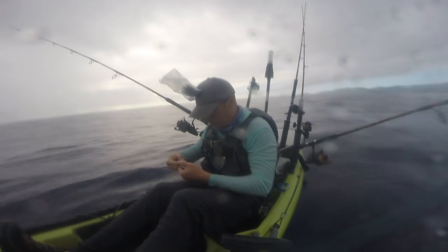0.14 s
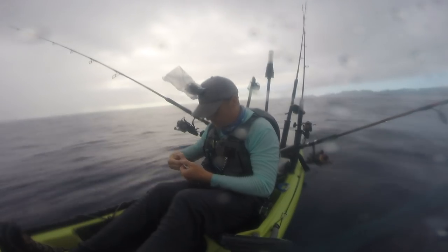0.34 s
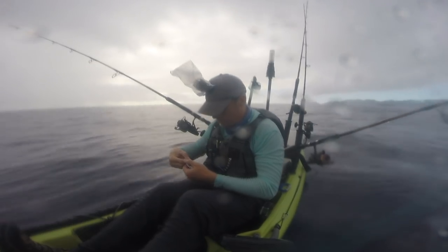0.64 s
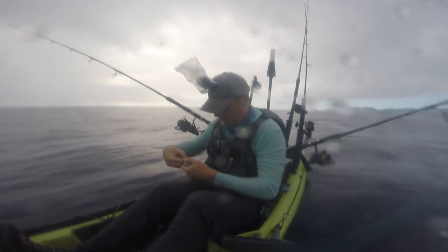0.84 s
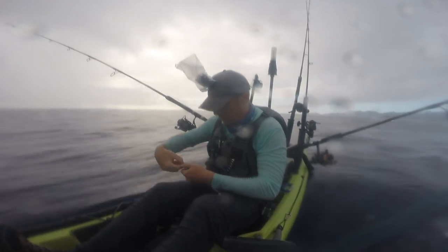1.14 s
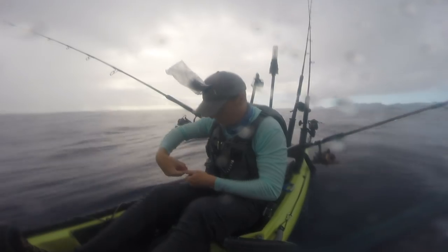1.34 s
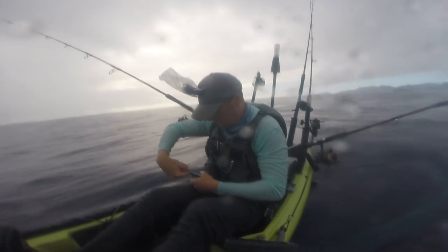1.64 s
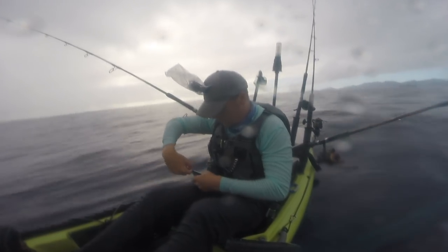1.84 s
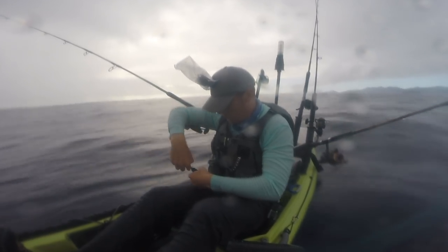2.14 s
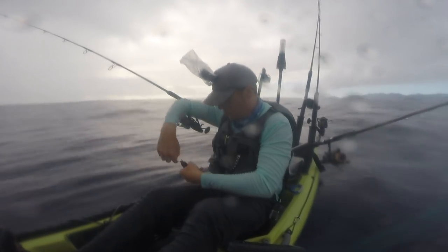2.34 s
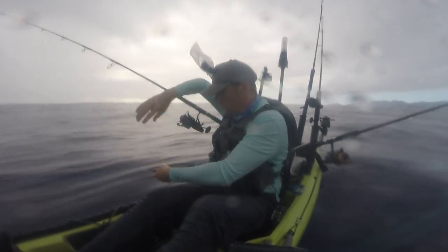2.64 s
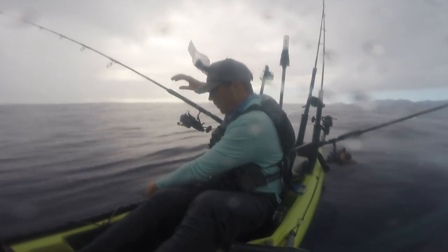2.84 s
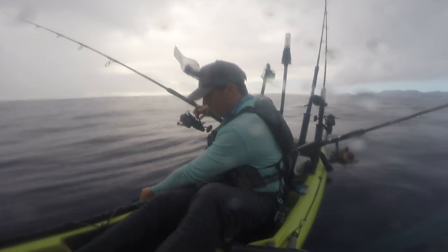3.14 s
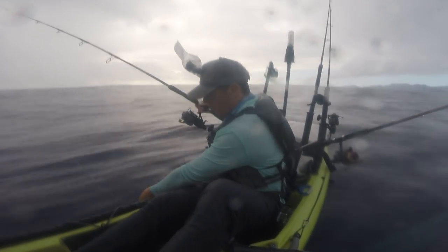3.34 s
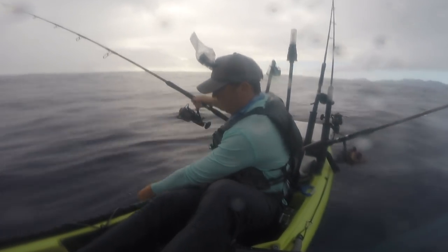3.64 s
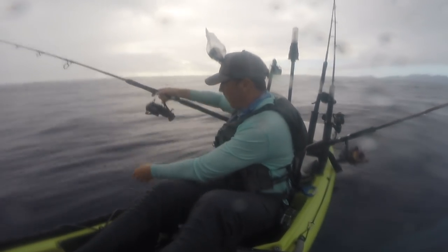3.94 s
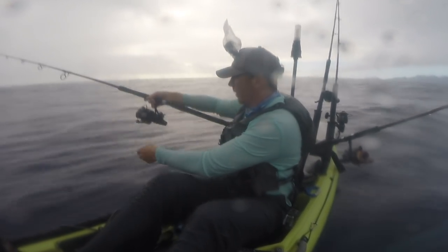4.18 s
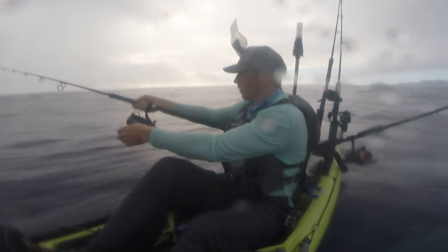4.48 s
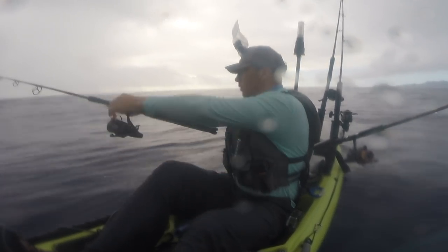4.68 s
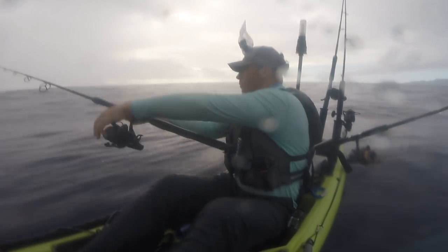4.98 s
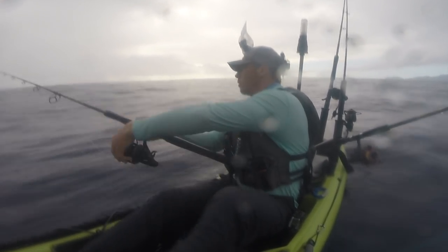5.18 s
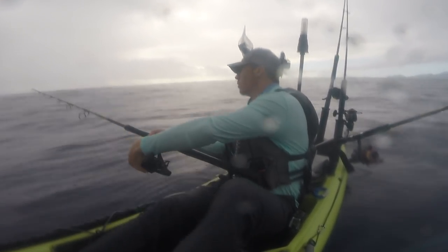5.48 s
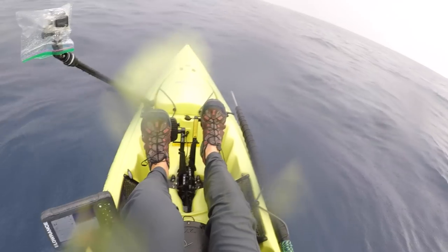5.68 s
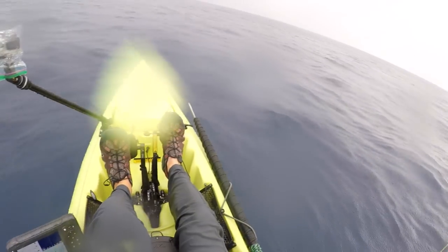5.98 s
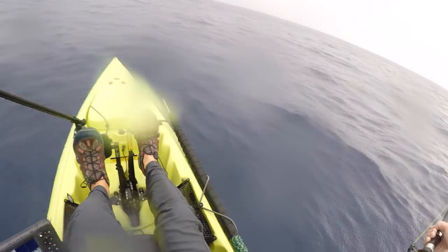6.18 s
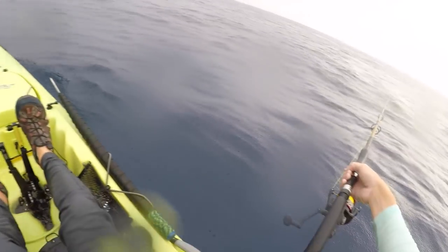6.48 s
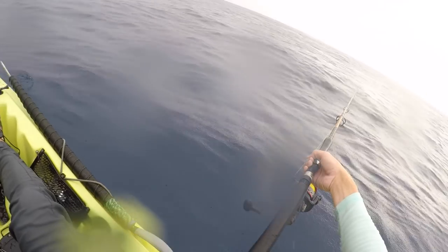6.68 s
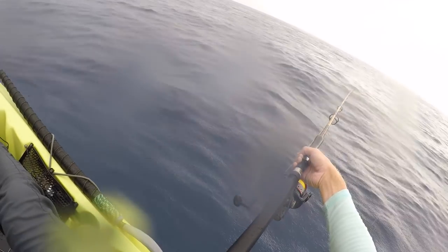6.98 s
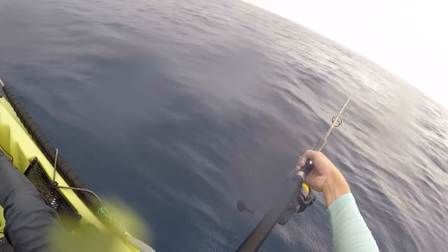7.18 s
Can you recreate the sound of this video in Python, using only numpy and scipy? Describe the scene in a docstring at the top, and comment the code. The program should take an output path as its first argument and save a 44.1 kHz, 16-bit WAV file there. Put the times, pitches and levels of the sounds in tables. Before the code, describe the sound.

Muffled rain thuds and snaps on loose plastic with hollow hull slaps, then a sudden switch to lumpy wind, fizzing water and sharp spits.

```python
"""Rain at sea on a fishing kayak, heard first by a microphone wrapped in a plastic bag, then by a bare one.
From the start rain on the sea and a rumble come muffled through the bag, and drops and droplets tap on it:
struck modes of film and housing ring and the air behind pops. Slaps boom in hollows; later the bag crumples.
At 5.69 s the bagged sound fades out; wind builds up as slow lumpy noise, and water rushes past as noise
with ringing bubbles and fizz. Sharp spits of water and bright crackles of bursting foam follow."""
import sys
import numpy as np
from scipy import signal
from scipy.io import wavfile

SR = 44100
rng = np.random.default_rng(int(sys.argv[2]) if len(sys.argv) > 2 else 0)


def master_out(mix):
    """Clip the mix to full scale and print it as 16-bit PCM to the path in sys.argv[1]."""
    frames = np.transpose(np.atleast_2d(mix))
    ceiling = np.clip(frames, -1, 1)
    pcm = np.round(ceiling * 32767).astype(np.int16)
    wavfile.write(sys.argv[1], SR, pcm)


N = 322812
TIME = np.arange(N) / SR
AGE = np.arange(SR // 15) / SR   # seconds since an impact

# big drops on the bag; levels are rms over 10 ms, the snap's before a common trim
# columns: start_s, pop_level_db, pop_pitch_hz, snap_level_db
BIG_DROPS = [(0.0316, -36, 505, -66), (0.0502, -34.0, 675, -41), (0.1147, -36.5, 684, -45),
             (0.2455, -15.5, 830, -41.5), (0.3873, -27.5, 520, -40), (0.4833, -28, 880, -38),
             (0.611, -29.5, 485, -42), (0.631, -26.0, 624, -29), (0.8003, -22.5, 780, -22.5),
             (0.8054, -18.5, 840, -33), (0.8502, -35.5, 700, -41.5), (0.9587, -28, 575, -42.0),
             (0.977, -39.5, 506, -47), (1.2075, -22, 600, -26), (1.2994, -39, 690, -37),
             (1.3357, -36.5, 656, -34), (1.3797, -27.5, 610, -40), (1.4563, -25, 614, -34),
             (1.4873, -42.5, 770, -56), (1.5133, -32, 780, -44), (1.5502, -54, 750, -39),
             (1.6518, -26, 400, -47), (1.6841, -37, 640, -45), (1.7425, -25.5, 840, -31),
             (1.753, -34.5, 530, -49), (1.7895, -27.5, 940, -34.5), (1.853, -29, 1040, -35.0),
             (2.031, -39, 880, -41.5), (2.0419, -40.5, 1070, -43.0), (2.211, -32, 654, -44.5),
             (2.2187, -27.5, 546, -45), (2.229, -32.5, 770, -45.5), (2.3355, -16, 676, -27),
             (2.3473, -32, 620, -36), (2.4, -24.5, 696, -34.0), (2.525, -31.5, 457, -62),
             (2.5747, -23.5, 690, -31.5), (2.619, -31.5, 606, -37.5), (2.712, -21.5, 620, -38),
             (2.7691, -31.5, 775, -48.5), (2.7922, -49, 820, -25.5), (2.9027, -34, 543, -56),
             (2.9788, -30.0, 730, -45.5), (3.0177, -22, 826, -34), (3.047, -49, 480, -36.5),
             (3.0915, -17.5, 560, -31), (3.2013, -20.0, 856, -25), (3.3002, -61, 620, -35.5),
             (3.3333, -26, 710, -35.0), (3.364, -30.5, 573, -39), (3.3799, -24, 680, -40.5),
             (3.3995, -35, 600, -42), (3.4063, -30.5, 595, -45.5), (3.5208, -34.0, 910, -44.5),
             (3.5261, -28, 955, -35.5), (3.5888, -13.0, 680, -26.5), (3.6278, -29.5, 546, -36.5),
             (3.6824, -32, 845, -41), (3.8438, -24.5, 530, -40.5), (3.9099, -32, 780, -43),
             (3.9981, -20, 700, -31), (4.1115, -35.0, 735, -63), (4.274, -34.5, 860, -42.5),
             (4.31, -43, 780, -63), (4.364, -35, 496, -45.5), (4.4319, -32, 790, -37.5),
             (4.4573, -42.5, 795, -40), (4.479, -34.5, 520, -36), (4.5205, -46, 835, -37),
             (4.6318, -29.5, 615, -39.5), (4.674, -27.0, 780, -36.5), (4.765, -31.0, 730, -37.5),
             (4.816, -24, 860, -25), (4.826, -32.5, 520, -50), (4.898, -30, 476, -35.5),
             (5.2027, -31, 960, -37), (5.285, -32.0, 650, -51), (5.3057, -37.5, 360, -49),
             (5.393, -22.5, 567, -38.5), (5.4156, -30.5, 920, -43.5), (5.5234, -36, 580, -45),
             (5.6077, -15.5, 667, -30.5)]
# modes of the plastic film; columns: pitch_hz, width_hz, relative_level_db
FILM_MODES = [(1480, 660, -2.5), (2100, 860, -0.5), (2992, 374, 5), (3160, 403, 6.5), (3880, 680, -12.5)]
# modes of the spray's tick; columns: pitch_hz, width_hz, relative_level_db
SPRAY_MODES = [(4880, 1400, -7.5), (5170, 890, 1), (6900, 540, -8), (7560, 810, -12.5), (11100, 1240, -18),
               (13600, 2300, -22.5)]

MID_POP_HZ, MID_POP_DB = 700, -30   # the pop of a middling drop
CHANGE_S, CROSSFADE_S = 5.69, .02   # the bagged sound starts to fade, and how long it takes
RUSH_BUILD_S = 0.13


def from_db(db):
    """Decibels to amplitude gain: 20 dB is a factor of ten."""
    return 10 ** (np.asarray(db) / 20)


def rms_one(x):
    """Normalise the mean power: scale to rms 1."""
    return x / np.sqrt(np.mean(x ** 2) + 1e-20)


def at_level(x, db):
    """Equal energy: a short sound gets the energy of 10 ms at this rms level."""
    return from_db(db) * x * np.sqrt(SR / 100 / (np.sum(x ** 2) + 1e-20))


def add(out, start_s, sound):
    """Superposition: mix a short sound in at its start time."""
    i = max(int(start_s * SR), 0)
    out[i:i + len(sound)] += sound[:N - i]


def band(x, low_hz, high_hz, order=2):
    """Causal band-pass filtering by a Butterworth network."""
    edges = [low_hz, min(high_hz, SR * 9 / 20)]
    return signal.sosfilt(signal.butter(order, edges, "band", fs=SR, output="sos"), x)


def drift(corner_hz):
    """Low-passed chance: two equal poles smooth white noise into a slow drift with spread 1."""
    step = 40   # samples between the computed points
    r = np.exp(-2 * np.pi * corner_hz * step / SR)
    white = rng.standard_normal(N // step + 2002)
    slow = signal.lfilter([1], [1, -2 * r, r * r], white)[2000:]   # drop the settling time
    return np.interp(np.arange(N) / step, np.arange(len(slow)), rms_one(slow))


def resonate(x, hz, width_hz):
    """Damped resonance: a pole pair whose radius sets the width, with gain 1 on top."""
    r = np.exp(-np.pi * width_hz / SR)
    zeros = np.array([1, 0, -1]) * (1 - r * r) / 2
    poles = [1, -2 * r * np.cos(2 * np.pi * hz / SR), r * r]
    return signal.lfilter(zeros, poles, x + 1e-18)


def body(force, modes, scatter_db, detune):
    """Modal superposition: the spot that is struck changes the strength and pitch of each mode."""
    luck = rng.standard_normal((len(modes), 2))
    out = 0
    for k, (hz, width_hz, db) in enumerate(modes):
        gain = (-1) ** k * from_db(db + scatter_db * luck[k, 0])
        out = out + gain * resonate(force, hz * np.exp(detune * luck[k, 1]), width_hz)
    return out


def contact(splash_s, splash):
    """Impact force: a sharp first touch, the irregular push of spreading water, and sparse crinkles."""
    spread, crinkles = rng.standard_normal((2, len(AGE)))
    sparse = rng.random(len(AGE)) < .04
    push = spread * np.exp(-AGE / splash_s)
    crinkle_gain, crinkle_s = 4 * from_db(-4.0), 0.0016
    crinkling = crinkle_gain * sparse * crinkles * np.exp(-AGE / crinkle_s)
    force = splash * (push + crinkling)
    force[0] += 1
    return force


def coloured(spectrum, flicker_db, flicker_hz):
    """Shaped noise: white noise in narrow bands, each level flickering independently; rms 1."""
    hz, db = np.transpose(spectrum)
    edge_count = int(2.5 * np.log2(hz[-1] / hz[0])) + 2
    edges = np.geomspace(hz[0], hz[-1], edge_count)
    white, out = rng.standard_normal((2, N)), 0
    for k, (low, high) in enumerate(zip(edges, edges[1:])):
        level_db = np.interp(np.log(low * high) / 2, np.log(hz), db)
        gain = from_db(level_db + flicker_db * drift(flicker_hz))
        out = out + gain * band(white[k % 2], low, high)   # neighbouring bands stay independent
    return rms_one(out)


def grains(per_s, spread_db, spectrum, low_hz, high_hz, cycles, count=20):
    """Poisson process: random tiny impacts, each ringing a few cycles at one of many pitches; rms 1."""
    hz, db = np.transpose(spectrum)
    born = rng.random(N) < per_s / SR
    strength = from_db(spread_db * np.minimum(rng.exponential(1, N), 3))
    clicks = born * strength * rng.choice([-1, 1], N)
    dealt = rng.integers(0, count, N)   # which pitch each impact excites
    out = 0
    for k, pitch_hz in enumerate(np.geomspace(low_hz, high_hz, count)):
        gain = from_db(np.interp(np.log(pitch_hz), np.log(hz), db))
        out = out + gain * resonate(clicks * (dealt == k), pitch_hz, 2 * pitch_hz / cycles)
    return rms_one(out)


def surges(times, levels_db, rise_s, fall_s, steady_db=-120):
    """Power addition: gain of a steady level plus surges that rise and die away exponentially."""
    power = from_db(steady_db) ** 2
    for peak_s, db in zip(times, levels_db):
        exponent = np.minimum((TIME - peak_s) / rise_s, (peak_s - TIME) / fall_s)
        power = power + from_db(db) ** 2 * np.exp(2 * exponent)
    return np.sqrt(power)


def build_up(length_s):
    """Linear onset: gain that grows evenly from the change to the bare microphone, then holds."""
    return np.clip((TIME - CHANGE_S) / length_s, 0, 1)


def sea_through_bag():
    """Broadband noise of rain on open water over a low rumble; passing swells lift both."""
    # crests of the rumble; columns: peak_s, level_db
    swell_crests = [(1.4, -52.5), (2.6, -63), (3.42, -45), (4.65, -51)]
    # rain on the sea through plastic; columns: pitch_hz, relative_density_db_per_hz
    wash_spectrum = [(150, -5), (300, -3), (550, -9), (800, -4), (1080, 0), (1400, -39), (2100, -9.5),
                     (3100, -20.5), (4100, -29), (5200, -23), (6500, -35), (10000, -35), (15500, -43)]
    # low rumble; columns: pitch_hz, relative_density_db_per_hz
    rumble_spectrum = [(22, -39), (40, -9), (60, 1), (100, -6), (160, -7), (260, -12)]
    wash_db, rumble_db = -53.5, -51.5   # at rest
    wash_follows = 0.87   # dB of wash per dB of rumble
    patter_db = -5.0   # against the wash
    swell = surges(*np.transpose(swell_crests), rise_s=0.095, fall_s=0.67, steady_db=rumble_db)
    wash = coloured(wash_spectrum, flicker_db=2.8, flicker_hz=47)
    patter = from_db(patter_db) * grains(900, 3.4, wash_spectrum, 636, 7750, cycles=8.5, count=12)
    rumble = coloured(rumble_spectrum, flicker_db=2.5, flicker_hz=4.8)
    wash_gain = from_db(wash_db) * (swell / from_db(rumble_db)) ** wash_follows
    return swell * rumble + wash_gain * (wash + patter)


def pop(hz):
    """Damped oscillation: air behind the film swings briefly, and the loose bag flutters on."""
    swing = AGE * np.exp(-AGE / 0.00054) * -np.sin(2 * np.pi * hz * AGE)
    flutter_envelope = np.exp(-AGE / 0.0029) * (1 - np.exp(-AGE / 0.0011))
    flutter = band(rng.standard_normal(len(AGE)) * flutter_envelope, 331, 1097, order=3)
    flutter_db = -4.0   # against the swing
    return at_level(at_level(swing, 0) + at_level(flutter, flutter_db), 0)


def drops_on_bag():
    """Impact excitation: each drop snaps the film, pops the air behind it and shakes the housing."""
    # modes of the microphone housing; columns: pitch_hz, width_hz, relative_level_db
    housing_modes = [(70, 22, -3.5), (131.4, 18.3, -6), (182, 25.7, 0), (274.4, 86, -6.5), (370, 55, -1.5)]
    # a drop on slack film pops low and shakes the housing; on taut film it pops high and hardly does
    thud_mid_db, thud_follows, thud_db_per_octave = -37, 0.79, -11   # middling drop; dB per dB of pop
    # the spray ticks with the snap, the more so where the snap outweighs the pop (dB per dB)
    tick_below_snap_db, tick_sharpens = 6.5, 0.062
    snap_trim_db = -0.5
    out = np.zeros(N)
    for start_s, pop_db, pop_hz, snap_db in BIG_DROPS:
        octaves = np.log2(pop_hz / MID_POP_HZ)
        thud_db = thud_mid_db + thud_follows * (pop_db - MID_POP_DB) + thud_db_per_octave * octaves
        tick_db = snap_db - tick_below_snap_db + tick_sharpens * (snap_db - pop_db)
        force = contact(splash_s=.0009, splash=.55)
        housing_force = contact(splash_s=0.0055, splash=0.071)
        thud = band(body(housing_force, housing_modes, scatter_db=5.0, detune=0.16), 23, 537)
        snap = band(body(force, FILM_MODES, scatter_db=3.0, detune=0.066), 1480, 5600)
        tick = band(body(force, SPRAY_MODES, scatter_db=1.0, detune=0.055), 3500, 11000)
        drop = at_level(thud, thud_db) + from_db(pop_db) * pop(pop_hz)
        drop = drop + at_level(snap, snap_db + snap_trim_db) + at_level(tick, tick_db)
        add(out, start_s, drop)
    return out


def droplet():
    """Impact of small mass: a small pop, snap and tick, too light to shake the housing."""
    force = contact(splash_s=0.00078, splash=0.22)
    snap = body(force, FILM_MODES, scatter_db=4, detune=.04)
    tick = body(force, SPRAY_MODES, scatter_db=2, detune=.07)
    pop_hz = 750 * np.exp(0.24 * rng.standard_normal())
    return pop(pop_hz) + at_level(snap, -6.5) + at_level(tick, -16.0)   # dB against the pop


def drizzle():
    """Random arrivals of fine droplets, and rebound: each big drop throws off one that lands after it."""
    count, level_db, spread_db = 110, -48.0, 2.5
    rebound_s, rebound_db, rebound_follows = .018, -50.5, 0.39   # middling drop; dB per dB of pop
    out = np.zeros(N)
    starts_s = rng.uniform(0, CHANGE_S, count)
    for start_s, size_db in zip(starts_s, rng.normal(level_db, spread_db, count)):
        add(out, start_s, from_db(size_db) * droplet())
    for start_s, pop_db, _, _ in BIG_DROPS:
        delay_s = rebound_s * (.5 + rng.random())
        size_db = rebound_db + rebound_follows * (pop_db - MID_POP_DB)
        add(out, start_s + delay_s, from_db(size_db) * droplet())
    return band(out, 195, 6100)


def hull_slaps():
    """Cavity resonance: a wavelet or heavy drop shakes boat or mount; a hollow booms under a dull splash."""
    # slaps, splash level against the hollow
    # columns: peak_s, level_db, swell_s, fade_s, hollow_pitch_hz, splash_level_db
    slap_events = [(0.641, -33.5, 0.025, 0.028, 65.3, -33), (1.228, -30.5, 0.011, 0.0079, 132, -15),
                   (2.341, -22, .003, 0.011, 141, -26), (2.533, -26, 0.0058, 0.0077, 190, -28),
                   (2.636, -31.5, 0.039, 0.027, 59, -31), (2.923, -23.5, .008, .019, 272, -1.5),
                   (2.988, -28, 0.0022, 0.014, 150, -19), (4.536, -31, 0.0026, 0.013, 116, -16),
                   (5.801, -24, 0.025, 0.019, 105.3, -57), (5.829, -25, 0.019, 0.017, 132, -46)]
    # resonances of the wet splash; columns: pitch_hz, width_hz, relative_level_db
    splash_modes = [(400, 420, -15), (520, 210, -1), (780, 270, -13), (980, 90, -9)]
    out = np.zeros(N)
    t = np.arange(-SR // 10, SR // 5) / SR   # time from the peak
    for peak_s, db, swell_s, fade_s, hollow_hz, splash_db in slap_events:
        envelope = np.exp(np.minimum(t / swell_s, -t / fade_s)) * signal.windows.tukey(len(t), 1 / 4)
        tone = np.sqrt(2) * np.sin(2 * np.pi * hollow_hz * t)
        breath = rms_one(resonate(rng.standard_normal(len(t)), hollow_hz, hollow_hz / 2))
        hollow = band(tone + 0.29 * breath, 30, 440)
        # the splash is a quick run of wet knocks and dies sooner than the hollow
        knocks = np.zeros(len(t))
        at = np.cumsum(rng.uniform(.003, .0055, 40) * SR).astype(int)
        knocks[at] = from_db(2 * rng.standard_normal(len(at)))
        ringing = sum(from_db(gain_db) * resonate(knocks, hz, width_hz)
                      for hz, width_hz, gain_db in splash_modes)
        splash = rms_one(band(ringing, 270, 990, order=4)) * np.exp(-np.maximum(t, 0) / 0.033)
        slap = from_db(db) * envelope * (hollow + from_db(splash_db) * splash)
        add(out, peak_s + t[0], slap)
    return out


def crumple():
    """Buckling: creases of wet film give way in a dense crackle of short rings."""
    # brief crumples of the bag; columns: peak_s, level_db
    crumple_events = [(3.363, -46), (3.40, -43)]
    # colour of the crackle; columns: pitch_hz, relative_level_db
    crumple_spectrum = [(500, 39), (1000, 12), (1500, 0), (2600, 11), (4000, -30), (5200, -49), (7500, -32)]
    strength = surges(*np.transpose(crumple_events), rise_s=.002, fall_s=0.039)
    return strength * grains(2500, 3.0, crumple_spectrum, 500, 7500, cycles=7, count=9)


def wind():
    """Turbulent pressure: eddies buffet the bare port, a steady breeze with short gusts on top."""
    # gusts, levels before the lumps; columns: peak_s, level_db
    gust_events = [(5.946, -27), (6.005, -32), (6.2, -30), (6.278, -25.5), (6.401, -23), (6.69, -26.5),
                   (6.79, -29.5), (7.025, -26.5), (7.26, -26)]
    # buffeting of the port; columns: pitch_hz, relative_density_db_per_hz
    buffet_spectrum = [(20, -4), (30, -4), (43, -3.5), (54, 1), (70, -6), (100, -13), (180, -18.5),
                       (300, -24.5), (500, -34.5), (900, -41)]
    breeze_db, breeze_build_s = -31.5, 0.21   # level before the lumps
    gusting = surges(*np.transpose(gust_events), rise_s=0.017, fall_s=0.033, steady_db=breeze_db)
    strength = build_up(breeze_build_s) * gusting
    lumps = from_db(1.5 * drift(29))
    return strength * lumps * coloured(buffet_spectrum, flicker_db=1.5, flicker_hz=14)


def open_water():
    """Flow noise and bubble resonance: water rushes by; its fine smooth fizz builds more slowly."""
    # rushing water and its bubbles; columns: pitch_hz, relative_density_db_per_hz
    rush_spectrum = [(400, 9), (1300, 2.5), (2000, 0), (3000, -7), (4400, -8.5), (5100, -13), (5900, -21),
                     (6800, -33), (8000, -38)]
    # resonances of the fizz; columns: pitch_hz, width_hz, relative_level_db
    fizz_modes = [(8930, 2100, 6), (10100, 1100, -2), (13400, 3000, -27)]
    rush_db, bubbles_db, fizz_db = -54, -54, -60.5   # the bubbles' before their band-pass
    rush = from_db(rush_db) * coloured(rush_spectrum, flicker_db=2.5, flicker_hz=12)
    ringing = grains(900, 4, rush_spectrum, 1060, 6800, cycles=26, count=16)
    bubbles = from_db(bubbles_db) * band(ringing, 600, 7000)
    hiss = sum(from_db(db) * resonate(rng.standard_normal(N), hz, width_hz)
               for hz, width_hz, db in fizz_modes)
    fizz = rms_one(band(hiss, 4600, 15000, order=3))
    fizz_gain = from_db(fizz_db) * np.sin(np.pi / 2 * build_up(0.81)) ** 2
    return build_up(RUSH_BUILD_S) * (rush + bubbles) + fizz_gain * fizz


def spits():
    """Impact excitation: sharp spits of water, with fainter ones at random once the water is rushing."""
    # the loudest spits, before a common trim; columns: start_s, peak_level_db
    loud_spits = [(5.891, -37.5), (5.9416, -29.5), (5.9952, -25.5), (6.231, -27), (6.4456, -29.5),
                  (6.5303, -31), (6.758, -34), (7.0278, -24.5), (7.09, -31.5), (7.1586, -29.5)]
    # modes a spit sets ringing; columns: pitch_hz, width_hz, relative_level_db
    spit_modes = [(1890, 390, -3), (3380, 740, -2), (4300, 810, -6), (6000, 940, -11), (9000, 1900, -45)]
    count, faint_db, faint_spread_db, trim_db = 10, -40, 3, -1.0   # peak level before the trim
    out = np.zeros(N)
    starts_s = rng.uniform(CHANGE_S + RUSH_BUILD_S, N / SR, count)
    faint = zip(starts_s, rng.normal(faint_db, faint_spread_db, count))
    for start_s, db in [*loud_spits, *faint]:
        force = contact(splash_s=0.0029, splash=0.4)
        spit = band(body(force, spit_modes, scatter_db=8.5, detune=0.037), 840, 7500)
        add(out, start_s, from_db(db + trim_db) * spit / np.abs(spit).max())
    return out


def foam():
    """Bubble resonance: tiny bubbles burst beside the hull in a bright crackle."""
    # patches of bursting foam, before the band-pass; columns: peak_s, level_db
    foam_patches = [(6.06, -53.5), (6.21, -52.5), (6.55, -55.5)]
    # colour of the crackle; columns: pitch_hz, relative_level_db
    foam_spectrum = [(3200, -9), (4300, 11), (5000, -10), (5800, 4), (6600, -19)]
    strength = surges(*np.transpose(foam_patches), rise_s=.07, fall_s=.11)
    crackle = grains(500, 5.0, foam_spectrum, 3200, 6600, cycles=30, count=10)
    return strength * band(crackle, 2000, 8000)


def scene():
    """Superposition: first the bagged microphone, then the bare one, with hull slaps in both."""
    bagged = sea_through_bag() + drops_on_bag() + drizzle() + crumple()
    bare = wind() + open_water() + spits() + build_up(RUSH_BUILD_S) * foam()
    fade_out = 1 - build_up(CROSSFADE_S)
    return (fade_out * bagged + hull_slaps() + bare)[None]


def record(dry):
    """Soft saturation and low-pass filtering: peaks are rounded below 0.96, then the top is cut."""
    rounded = dry / (1 + (dry / .96) ** 8) ** (1 / 8)
    low_pass = signal.ellip(10, .1, 80, 15800, fs=SR, output="sos")   # ripple dB, stop dB, cutoff Hz
    return signal.sosfilt(low_pass, rounded)


dry = scene()
out = record(dry)
master_out(out)
```